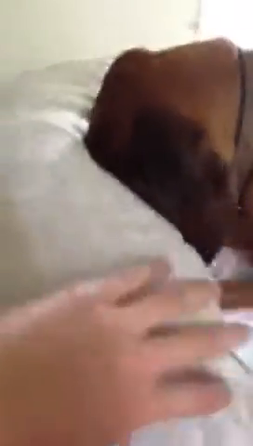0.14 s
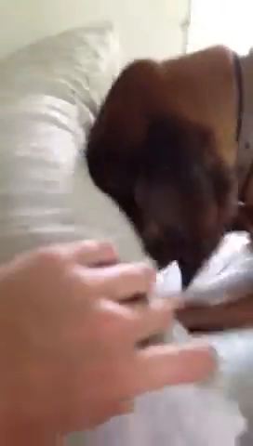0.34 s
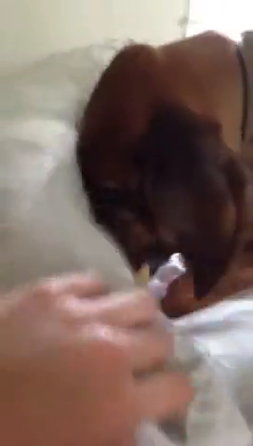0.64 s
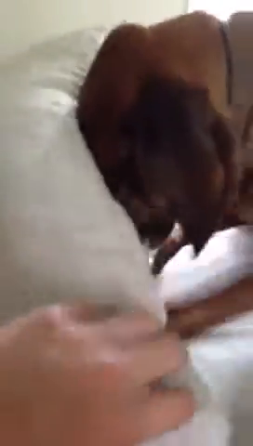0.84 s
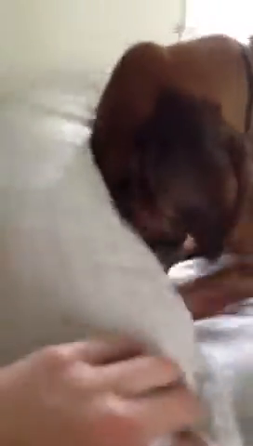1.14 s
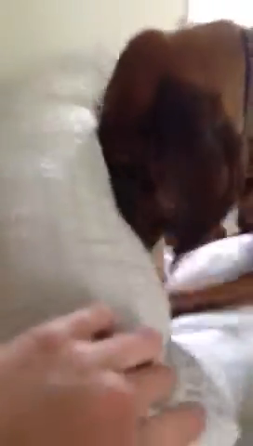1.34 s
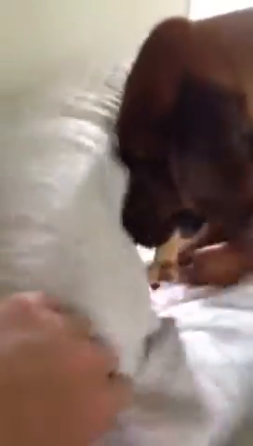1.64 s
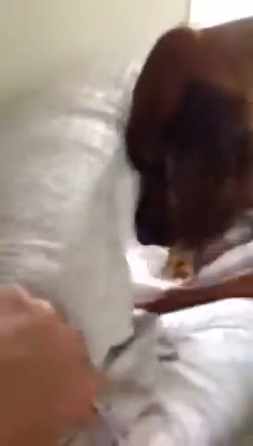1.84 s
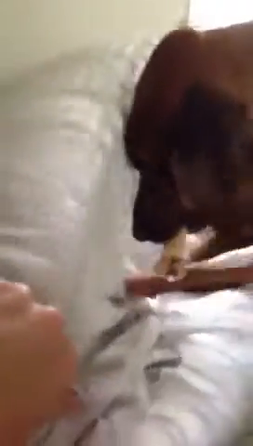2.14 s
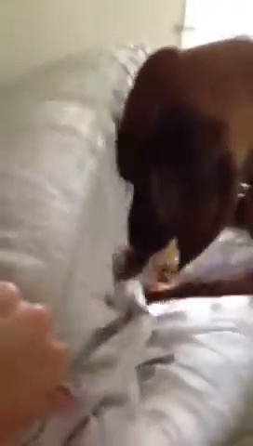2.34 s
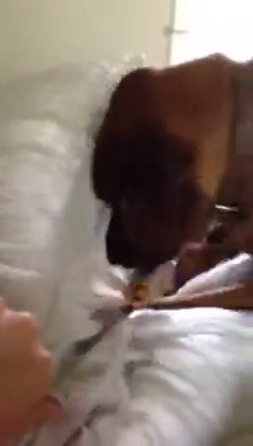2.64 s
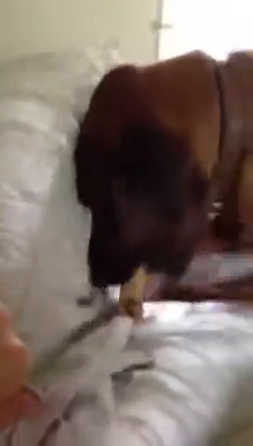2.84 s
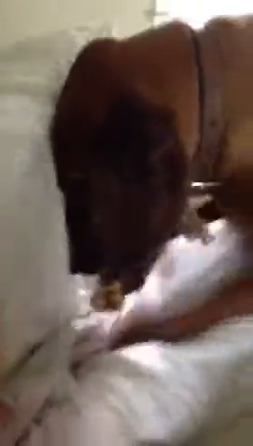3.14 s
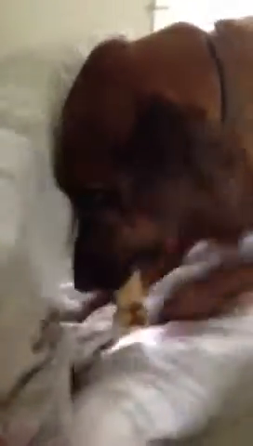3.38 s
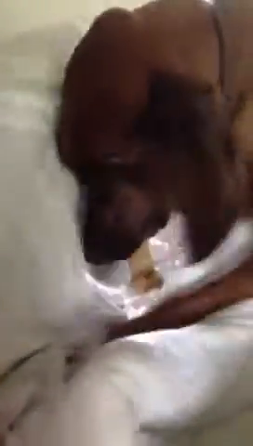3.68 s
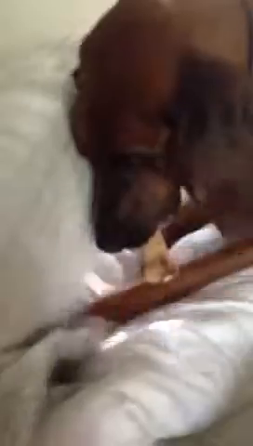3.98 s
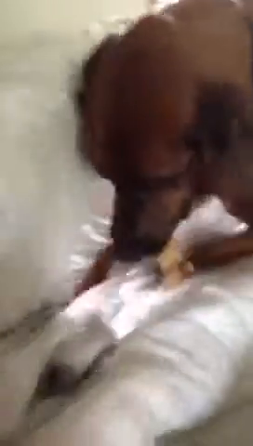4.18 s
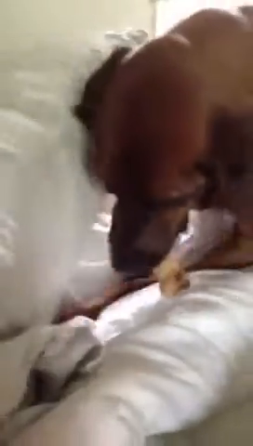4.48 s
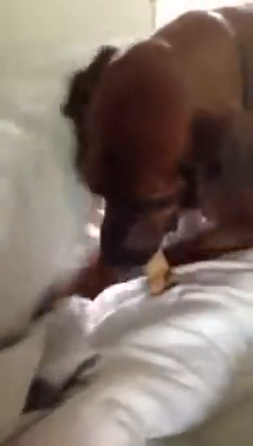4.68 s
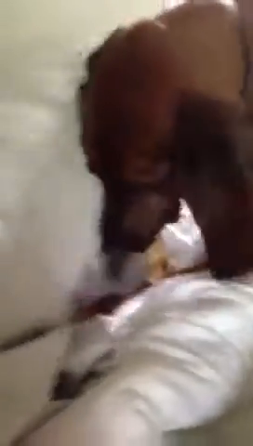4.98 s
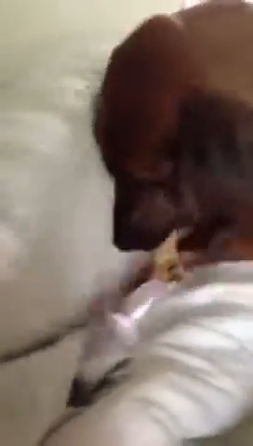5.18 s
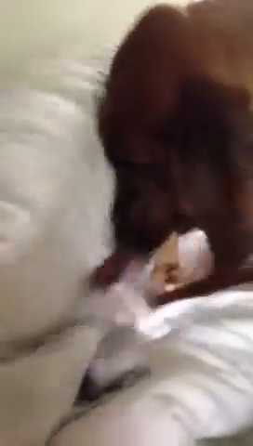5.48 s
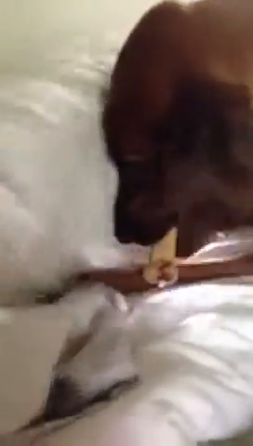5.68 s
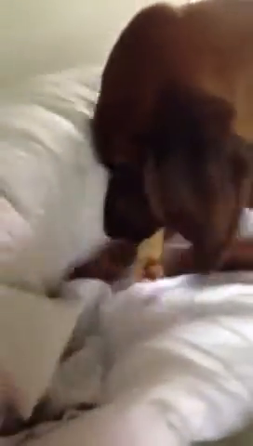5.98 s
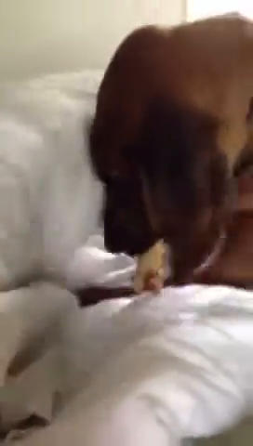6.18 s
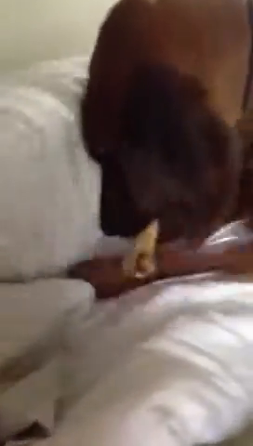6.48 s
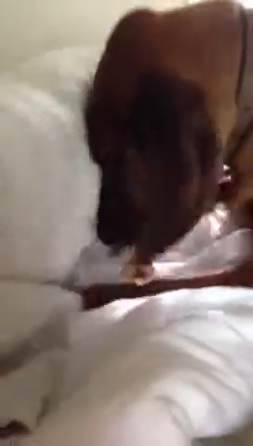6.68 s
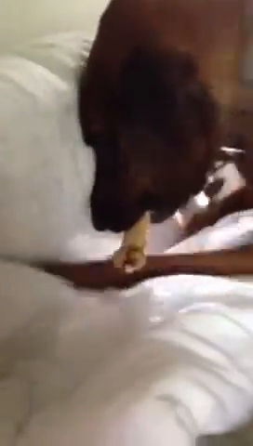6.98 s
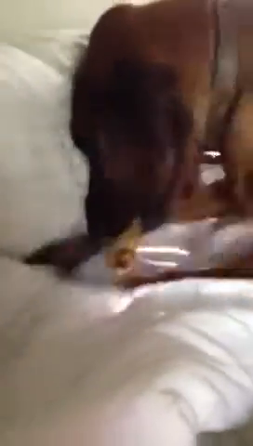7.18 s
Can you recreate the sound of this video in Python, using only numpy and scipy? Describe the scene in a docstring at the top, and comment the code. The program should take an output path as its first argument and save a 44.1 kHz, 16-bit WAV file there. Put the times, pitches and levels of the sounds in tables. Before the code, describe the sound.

Close, rhythmic pawing on bedding: dull mattress knocks, fabric scrapes and claw snaps grow stronger, while metal tags clink briefly in a quiet bedroom.

```python
"""A quiet bedroom: a dog digs at the sheets with both front paws, close to a phone; a hand brushes the pillow.
Strokes are random slips and snapping folds coloured as cloth, over noise coloured as shifting stuffing.
Thumps are short sagging tones with a mattress boom; snags are damped plucks with a crackle.
Now and then two metal collar tags clink as sums of fluttering sines.
The knocks get a short room tail; steady coloured noise is the room tone."""
import sys
import numpy as np
from scipy import signal
from scipy.fft import rfft, irfft, next_fast_len
from scipy.io import wavfile
from scipy.ndimage import uniform_filter1d, map_coordinates

SR = 44100
rng = np.random.default_rng(int(sys.argv[2]) if len(sys.argv) > 2 else 0)


def wav_out(sig):
    """Save sig, one row per channel (or a flat mono array), as 16-bit PCM at SR to the path in sys.argv[1]."""
    wavfile.write(sys.argv[1], SR, np.round(np.clip(np.atleast_2d(sig).T, -1, 1) * 32767).astype(np.int16))


N = 322812


def amp(db):
    """Gain of a level in dB."""
    return 10 ** (np.asarray(db) / 20)


def unit(x):
    """x at rms 1."""
    return x / np.sqrt(np.mean(x ** 2) + 1e-20)


def filtered(x, response):
    """x through a response given as a function of frequency in Hz."""
    m = next_fast_len(N + SR // 2)
    return irfft(rfft(x, m) * response(np.fft.rfftfreq(m, 1 / SR)), m)[:N]


def coloured(x, points):
    """x shaped by (frequency [Hz], gain [dB]) points, at rms 1."""
    point_hz, point_db = np.transpose(points)

    def response(hz):
        return amp(np.interp(np.log(hz + 1), np.log(point_hz + 1), point_db))

    return unit(filtered(x, response))


def wobble(knots_per_s, count=N):
    """A smooth random curve of count samples."""
    knots = rng.standard_normal(int(count * knots_per_s / SR) + 4)
    return map_coordinates(knots, [np.arange(count) * knots_per_s / SR])


def add(track, start_s, sound):
    """Mixes a sound into the track from start_s."""
    part = track[round(start_s * SR):][:len(sound)]
    part += sound[:len(part)]


def strokes():
    """Threads slip and folds snap under the pads; the same push makes the stuffing shift in lumps."""
    # paw strokes: (start [s], length [s], drag on cloth before growth [dB], stuffing before growth [dB])
    paw_strokes = [(0.173, 0.023, -59.5, -51.5), (0.263, 0.14, -59.5, -52), (0.589, 0.056, -57, -43),
                   (0.762, 0.13, -57, -51), (1.064, 0.1, -56, -46.5), (1.289, 0.065, -57, -43.5),
                   (1.412, 0.039, -61, -47), (1.526, 0.059, -48.5, -43), (1.918, 0.08, -54.5, -45),
                   (2.19, 0.046, -53.5, -42.5), (2.39, 0.055, -52.5, -46.5), (2.63, 0.034, -55.5, -42.5),
                   (2.832, 0.064, -57.5, -44), (3.086, 0.1, -53.5, -47.5), (3.31, 0.064, -47, -48),
                   (3.492, 0.035, -51, -42), (3.57, 0.11, -50.5, -42), (3.739, 0.089, -42, -41.5),
                   (3.934, 0.12, -47.5, -44), (4.148, 0.026, -38.5, -42.5), (4.233, 0.12, -53, -55.5),
                   (4.416, 0.056, -51, -45.5), (4.605, 0.062, -47, -43), (4.826, 0.092, -54.5, -48),
                   (5.049, 0.061, -46, -44.5), (5.25, 0.087, -50, -43), (5.463, 0.062, -44.5, -43),
                   (5.666, 0.072, -50, -47), (5.853, 0.095, -45.5, -42), (6.037, 0.18, -53.5, -49.5),
                   (6.321, 0.083, -46.5, -41), (6.507, 0.064, -52.5, -42.5), (6.714, 0.047, -52.5, -50.5),
                   (6.796, 0.019, -43, -46.5), (6.958, 0.077, -52.5, -38.5), (7.149, 0.091, -46.5, -43.5)]
    # sheet rustling between strokes: (time [s], level [dB])
    settling = [(0, -73), (2.6, -68.5), (7.32, -64.5)]
    # cloth spectrum: (frequency [Hz], density [dB per Hz])
    cloth = [(400, -2), (800, -9.5), (1860, -7.5), (2470, -3), (3670, -12), (4860, -10.5), (6280, -16.5),
             (10000, -19), (16000, -30.5)]
    # stuffing spectrum: (frequency [Hz], density [dB per Hz])
    mattress = [(60, -9), (130, 2), (190, -0.5), (350, -4.5), (620, -11), (1000, -45.5)]
    drag_grows_db, load_grows_db = 3.5, 3.5  # sheet bunches up, stuffing packs harder
    rest_load_db = -65  # stuffing between strokes
    judder_db, lumps_db = 1.5, 2.8

    _, _, drag_db, load_db = np.transpose(paw_strokes)
    settling_db = np.interp(np.arange(N) / SR, *np.transpose(settling))
    drag = pushes(paw_strokes, drag_db, drag_grows_db, settling_db)
    load = pushes(paw_strokes, load_db, load_grows_db, rest_load_db)
    judder = amp(judder_db * wobble(35))  # the paw sticks and lets go
    lumps = amp(lumps_db * wobble(45))

    threads = patchy(grit(1800, spread_db=2.1, hiss=1.1), depth_db=3)
    weave = coloured(threads, cloth) + 0.62 * creases(count=1800)
    stuffing = coloured(grit(300, spread_db=2.5, hiss=1.1), mattress)
    return judder * (drag * weave + load * lumps * stuffing)


def pushes(rows, levels_db, grows_db, rest_db):
    """Gain over time: each push bears down, grows by grows_db and lifts off, over a resting level."""
    dig_in_s, lift_s = 0.022, 0.037  # time constants
    power, t = np.zeros(N) + amp(2 * rest_db), np.arange(N) / SR
    for (start_s, length_s, *_), db in zip(rows, levels_db):
        first = max(0, round((start_s - 6 * dig_in_s) * SR))
        near = slice(first, round((start_s + length_s + 6 * lift_s) * SR))
        u = t[near] - start_s
        edges = np.exp(np.minimum(u, 0) / dig_in_s - np.maximum(u - length_s, 0) / lift_s)
        growth_db = grows_db * (np.clip(u / length_s, 0, 1) - 1.5)
        power[near] += (amp(db + growth_db) * edges) ** 2
    return np.sqrt(power)


def grit(slips_per_s, spread_db, hiss):
    """Random slips of very unequal size over a steady hiss."""
    hits = rng.random(N) < slips_per_s / SR
    sizes = amp(spread_db * np.minimum(rng.exponential(size=N), 4.5))
    slips = hits * rng.standard_normal(N) * sizes
    return unit(slips) + hiss * rng.standard_normal(N)


def patchy(x, depth_db):
    """Random patches of gain over pitch and time: folds of cloth come and go under the touch."""
    z = signal.stft(x, nperseg=256)[2]
    over_pitch = uniform_filter1d(rng.standard_normal(z.shape), size=5, axis=0)
    field = uniform_filter1d(over_pitch, size=6, axis=1)
    return signal.istft(z * amp(depth_db * unit(field)), nperseg=256)[1][:N]


def creases(count):
    """Many small folds snap over at random, each with its own pitch, size and damping; rms 1."""
    out, t = np.zeros(N), np.arange(SR // 50) / SR
    for when, pitch, size, taut in rng.random((count, 4)):
        snap = pluck(450 * 11 ** pitch, t, cycles=1.14 + 7.0 * taut ** 2)
        add(out, when * N / SR, amp(-3 * np.log(size + 0.11)) * snap)
    return unit(out)


def pluck(hz, t, cycles):
    """A taut patch of sheet let go: a sine whose decay constant is given in cycles."""
    return np.sin(2 * np.pi * hz * t) * np.exp(-t * hz / cycles)


def thumps():
    """The paw dents the sheet for a few cycles, sagging in pitch; the mattress booms on below it."""
    # paws landing on the mattress: (crest [s], level [dB], nominal pitch [Hz])
    landings = [(0.872, -34.5, 261), (1.364, -32.5, 189), (1.414, -32, 220), (1.429, -24.5, 220.2),
                (1.453, -34, 280), (1.584, -22.5, 210.5), (1.776, -32, 270), (1.811, -29.5, 290),
                (1.839, -24, 245), (1.986, -31, 312), (2.2121, -32, 232), (2.242, -28.5, 219),
                (2.362, -35, 308), (2.424, -33, 280), (2.513, -34.5, 220), (2.69, -27.5, 277),
                (2.878, -26, 334), (3.224, -36, 297), (3.324, -30, 342), (3.381, -28.5, 366),
                (3.513, -29.5, 302), (3.644, -29.5, 208), (3.769, -31, 306), (3.789, -27.5, 198),
                (3.97, -34, 266), (4.039, -20.5, 323), (4.058, -26.5, 203), (4.159, -20.5, 224),
                (4.171, -25, 267), (4.195, -22, 251), (4.463, -24.5, 278), (4.48, -24.5, 227),
                (4.667, -27.5, 293), (4.904, -32.5, 251), (4.921, -26.5, 210), (5.074, -31.5, 308),
                (5.119, -24, 284), (5.311, -41, 218), (5.334, -21, 208), (5.525, -22.5, 274),
                (5.541, -21, 189), (5.734, -17.5, 204.6), (5.958, -17.5, 213), (6.136, -27, 231),
                (6.325, -30, 318), (6.371, -27.5, 305), (6.401, -17.5, 326), (6.535, -31.5, 291),
                (6.814, -20, 188.8), (6.994, -27.5, 216), (7.196, -30, 230)]
    settle_ratio = 0.759  # final pitch over nominal pitch
    boom_centre_hz, boom_t60_s = 160.2, 0.089  # each boom is tuned near the centre

    out, t = np.zeros(N), np.arange(SR // 8) / SR
    scuffs = signal.lfilter([1], [1, -.85], rng.standard_normal((len(landings), len(t))))
    shapes = rng.random((len(landings), 3))
    for (crest_s, db, hz), (turn, girth, depth), scuff in zip(landings, shapes, scuffs):
        rise_s = (1.05 + .5 * girth) / hz * (250 / hz)  # broad or low dents are slower
        u = t / rise_s
        dent = (u * np.exp(1 - u)) ** 3.9

        sag = 1.113 * depth * hz * rise_s * (1 - np.exp(-u))
        phase = 2 * np.pi * (settle_ratio * hz * t + sag + turn)
        tone = np.sin(phase) + 0.28 * np.sin((1.462 + girth) * phase)

        boom_hz = boom_centre_hz * (0.876 + 0.314 * depth)
        boom_gain = 0.85 * (230 / hz) ** 1.04
        boom_envelope = (1 - np.exp(-u * u)) * amp(-60 * t / boom_t60_s)
        boom = boom_gain * boom_envelope * np.sin(2 * np.pi * (boom_hz * t + depth))

        pads = 0.029 * dent ** 2 * scuff  # the pads scuff the cloth as they land
        add(out, crest_s - rise_s, amp(db) * (dent * tone + boom + pads))
    return out


def snags():
    """A claw plucks a thread free: a cycle or two of the taut sheet and a brief crackle."""
    # claws catching the weave: (time [s], level [dB], pluck pitch [Hz])
    catches = [(1.074, -30, 1500), (1.093, -27, 1040), (1.4076, -29, 930), (1.4272, -25, 680),
               (1.4707, -45.5, 7500), (1.575, -28, 900), (1.61, -24.5, 704), (2.2372, -30.5, 2750),
               (2.389, -34, 895), (2.871, -34.5, 4040), (3.3217, -18, 834), (3.3802, -20, 1020),
               (3.7697, -19, 1200), (3.8376, -28, 696), (4.0382, -26, 2700), (4.155, -18.5, 1100),
               (4.667, -30, 2400), (5.056, -33, 2500), (5.115, -32.5, 1520), (5.3292, -32, 890),
               (5.661, -24, 1200), (5.7444, -47, 10300), (5.9545, -27.5, 2030), (6.134, -27.5, 1300),
               (6.399, -22.5, 1120), (6.549, -25, 2470), (6.706, -28, 686), (6.8119, -16, 1110),
               (7.0042, -23, 2560), (7.1912, -31.5, 4020)]
    crackle_1khz_db, crackle_db_per_octave = -30, 9.5  # finer threads crackle more
    crackle_t60_s = 0.0074

    out, t = np.zeros(N), np.arange(SR // 40) / SR
    noises = rng.standard_normal((len(catches), len(t)))
    for (start_s, db, hz), noise in zip(catches, noises):
        crackle_db = min(crackle_1khz_db + crackle_db_per_octave * np.log2(hz / 1000), 0)
        crackle = amp(crackle_db - 60 * t / crackle_t60_s) * signal.lfilter([1], [1, -.6], noise)
        add(out, start_s, amp(db) * (pluck(hz, t, cycles=0.38) + crackle))
    return out


def collar():
    """Each clink rings both tags at new strengths until they fall back on the fur; they flutter as they swing."""
    # collar clinks: (time [s], level [dB], share of the large tag [0-1], ring decay constant [ms])
    clinks = [(2.674, -52.5, 0.36, 6), (2.977, -50.5, 0.28, 36), (3.007, -48, 0.6, 14),
              (3.075, -61, 0.2, 58), (3.1113, -33.5, 0.8, 10), (3.122, -44.5, 0.1, 11),
              (3.153, -51, 0.5, 40), (3.232, -46, 0.7, 12), (3.2457, -39, 0.6, 5.6), (4.416, -63, 0.3, 25),
              (4.4358, -47, 0.2, 3.9), (4.45, -49, 0.8, 10), (5.752, -55, .02, 18), (5.779, -36, 0.63, 8)]
    # small tag modes: (frequency [Hz], mean level [dB])
    small_tag = [(10280, 0), (10460, -3), (10700, -10)]
    # large tag modes: (frequency [Hz], mean level [dB])
    large_tag = [(5465, -19), (5920, -13), (7755, -13), (11870, -10), (12060, -13), (14190, -4)]

    out, t = np.zeros(N), np.arange(SR // 4) / SR

    def ring(tag):
        """Sum of the tag's modes, each with a random strength and flutter."""
        total = np.zeros(len(t))
        for hz, db in tag:
            flutter_db = 5 * wobble(130, count=len(t))
            total += amp(db + rng.normal(0, 2.5) + flutter_db) * np.sin(2 * np.pi * hz * t)
        return total

    for start_s, db, share, decay_ms in clinks:
        share = np.clip(share, 0, 1)
        free = (1 - np.exp(-t / 0.0005)) * np.exp(-1000 * t / decay_ms)
        tags = (1 - share) * ring(small_tag) + share * ring(large_tag)
        tick_db = 0.5 * (db + 24) - 60 * t / 0.012  # harder knocks tick more
        tick = amp(tick_db) * np.diff(rng.standard_normal(len(t) + 1))
        add(out, start_s, amp(db) * (free * tags + tick))
    return out


def hand():
    """A light, bright swish of skin over the pillowcase: slips and hiss in patches."""
    # hand brushes: (start [s], length [s], level [dB])
    brushes = [(0.004, 0.012, -56), (0.088, 0.0069, -56.5), (1.7, 0.14, -54.5)]
    # pillowcase spectrum: (frequency [Hz], density [dB per Hz])
    pillow = [(900, 1), (3000, 3.5), (14000, -10.5)]
    touch = pushes(brushes, np.transpose(brushes)[2], grows_db=0, rest_db=-120)
    swish = patchy(grit(2500, spread_db=2.5, hiss=2.0), depth_db=3.0)
    return touch * coloured(swish, pillow)


def bedroom(x):
    """A short soft tail from a furnished room: noise after 4 ms, falling 60 dB in 0.1 s."""
    t = np.arange(SR // 4) / SR
    tail = rng.standard_normal(len(t)) * amp(-60 * t / 0.1) * (t > .004)
    return signal.fftconvolve(x, tail / np.linalg.norm(tail))[:N]


def room_tone():
    """Steady background noise of the room."""
    # room spectrum: (frequency [Hz], density [dB per Hz])
    spectrum = [(25, -28), (64, -32), (149, 0.5), (293, -2), (818, -16), (2760, -20), (14000, -28)]
    return amp(-58.5) * coloured(rng.standard_normal(N), spectrum)


def scene():
    """Knocks with their room tail, strokes, hand and room tone."""
    knocks = thumps() + snags() + collar()
    return (knocks + amp(-9) * bedroom(knocks) + strokes() + hand() + room_tone())[None]


def record(dry):
    """The phone microphone: two bass-cut stages beside a -18 dB direct path, and a hard band limit."""
    top_hz = 15350

    def bass_cut(hz, corner_hz, damping):
        """Second-order high-pass response."""
        return -hz ** 2 / (corner_hz ** 2 - hz ** 2 + 1j * damping * corner_hz * hz)

    def response(hz):
        steep = bass_cut(hz, 118, damping=0.96) * bass_cut(hz, 84.6, damping=2.02)
        return (steep + amp(-18)) * (hz < top_hz)

    return filtered(dry[0], response)[None]


dry = scene()
out = record(dry)
wav_out(out)
```